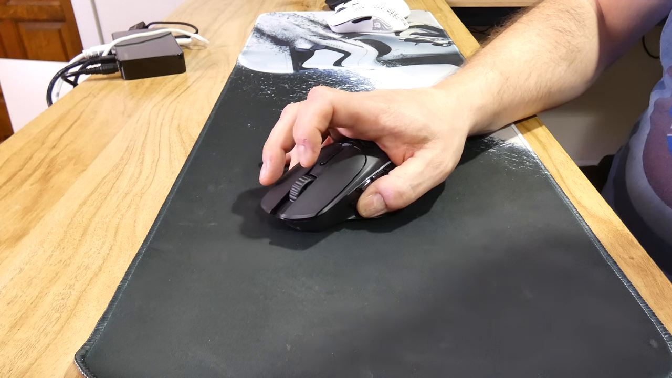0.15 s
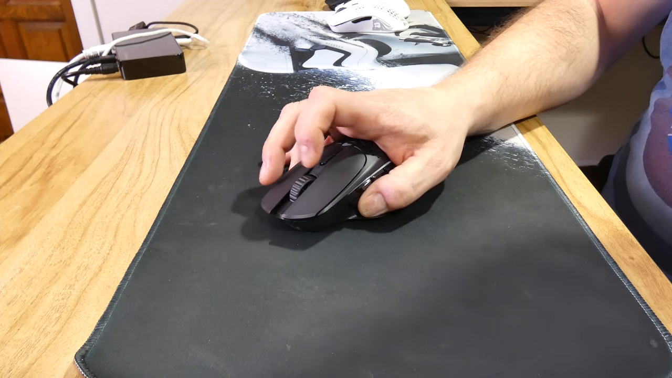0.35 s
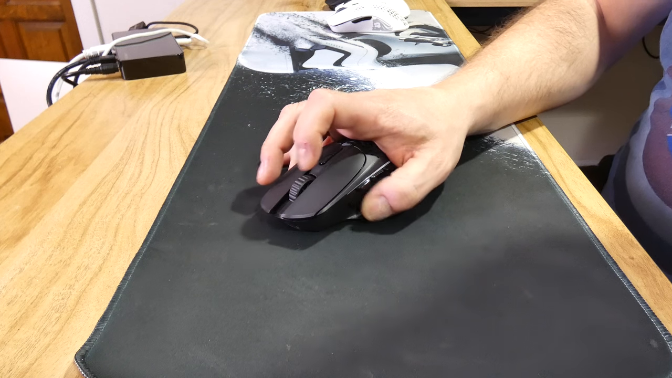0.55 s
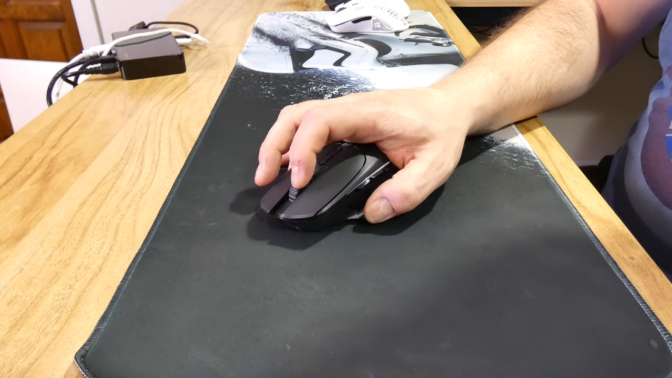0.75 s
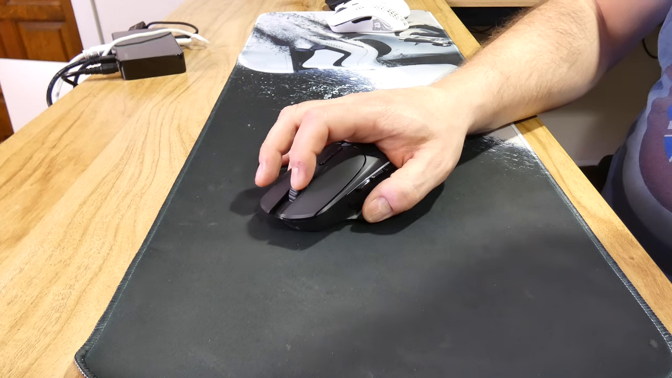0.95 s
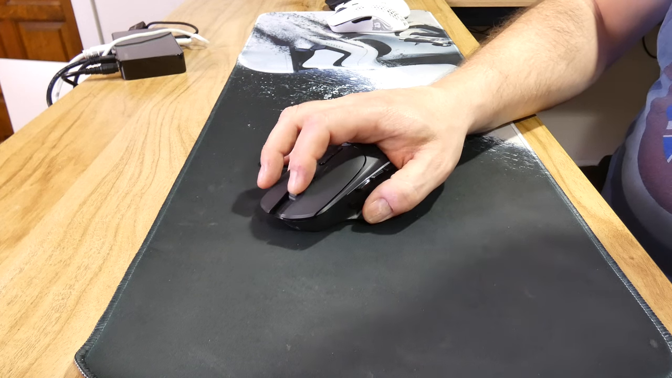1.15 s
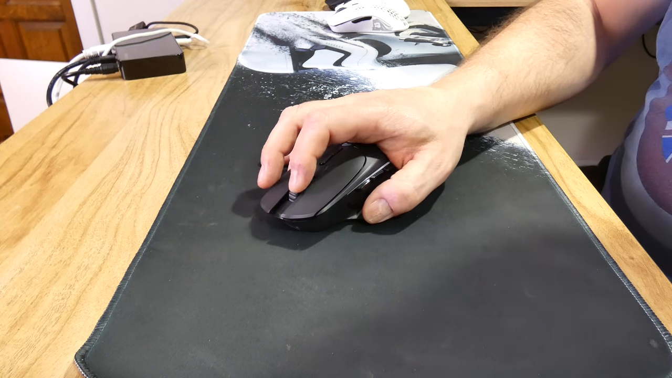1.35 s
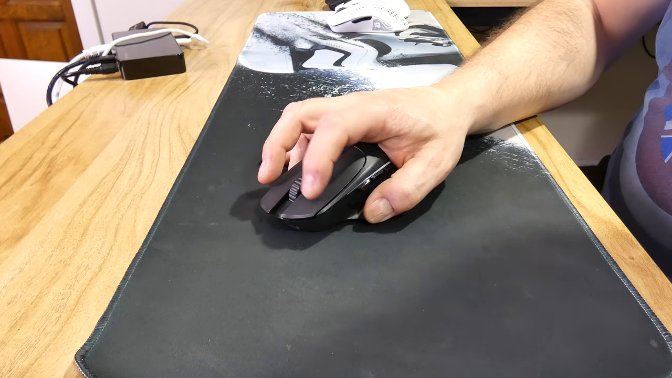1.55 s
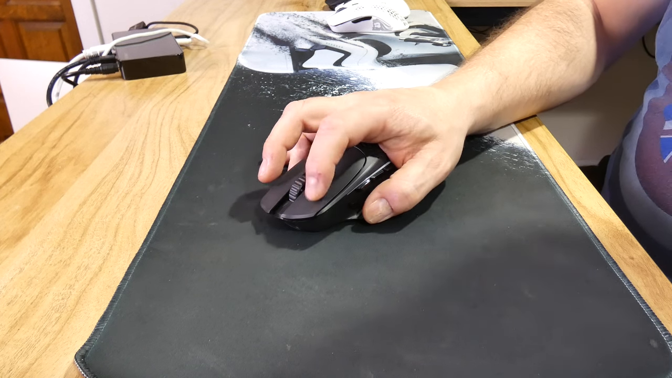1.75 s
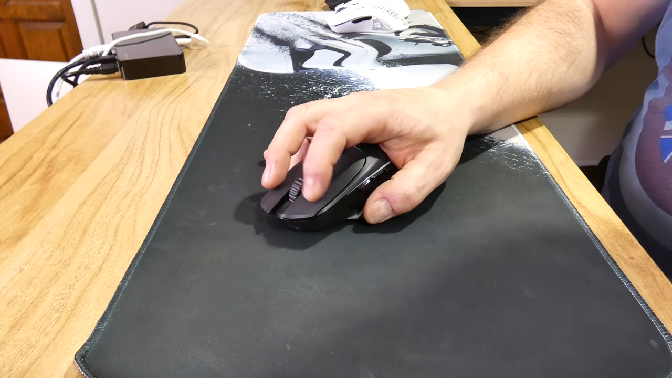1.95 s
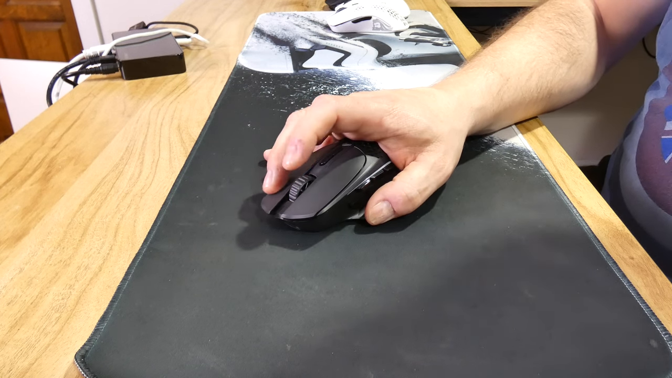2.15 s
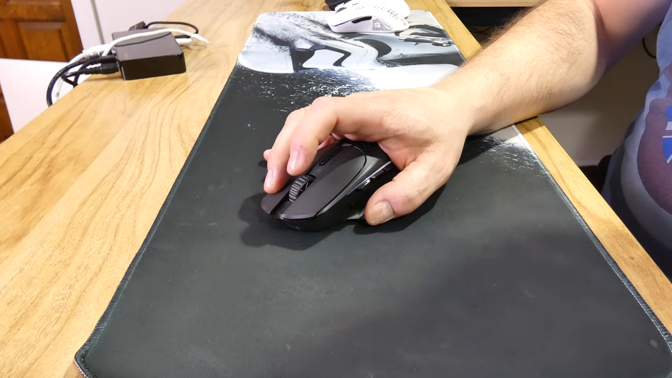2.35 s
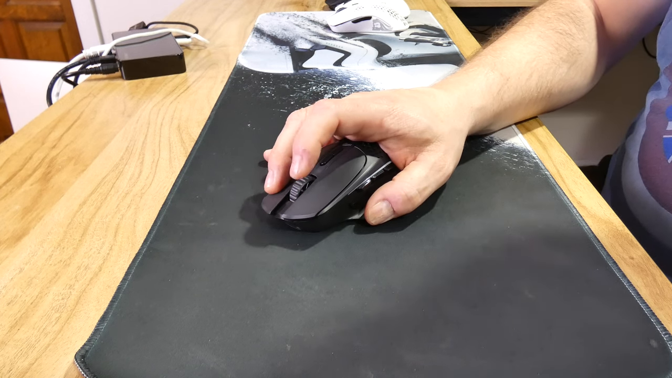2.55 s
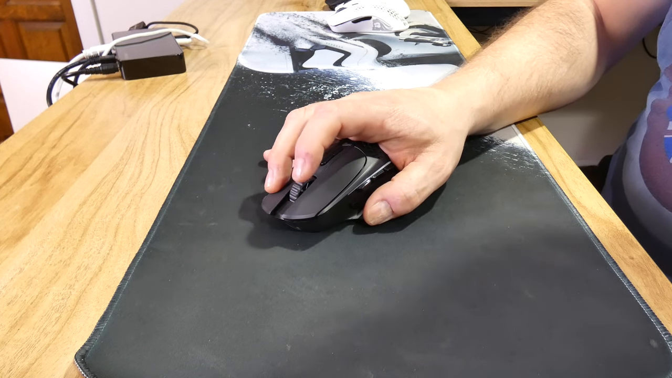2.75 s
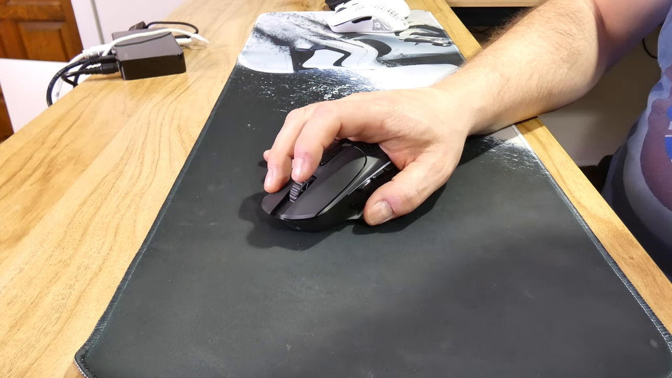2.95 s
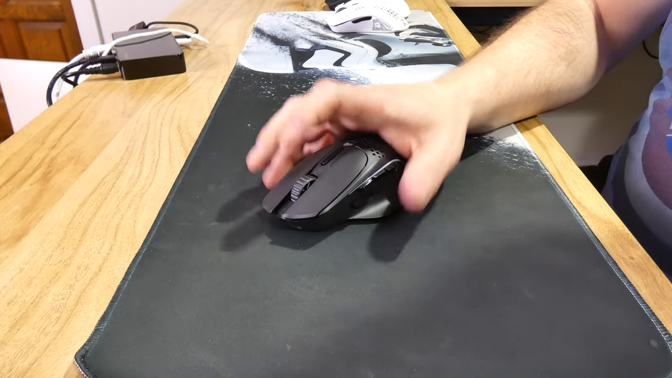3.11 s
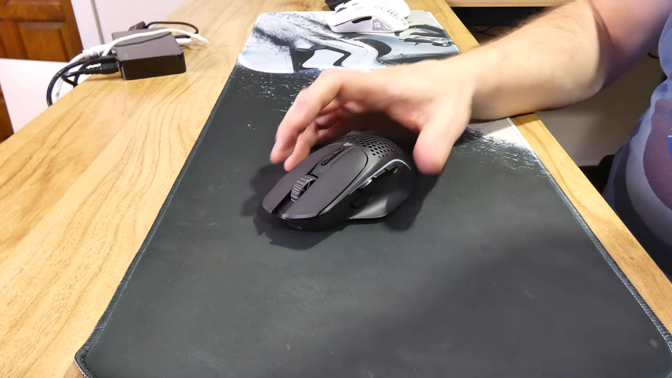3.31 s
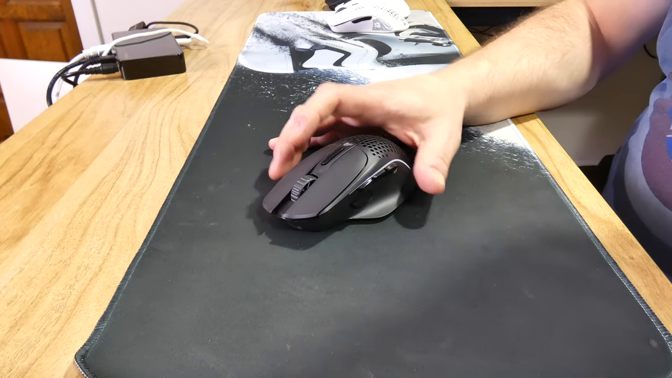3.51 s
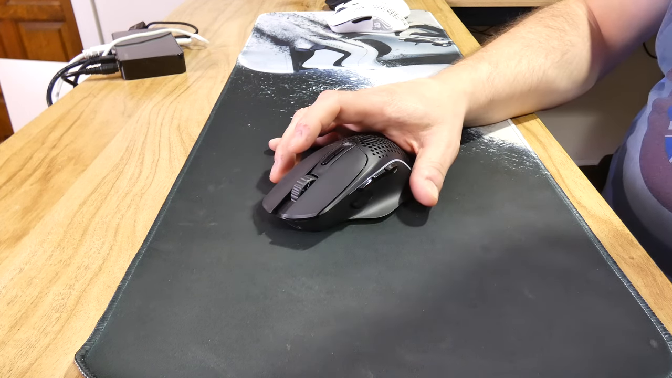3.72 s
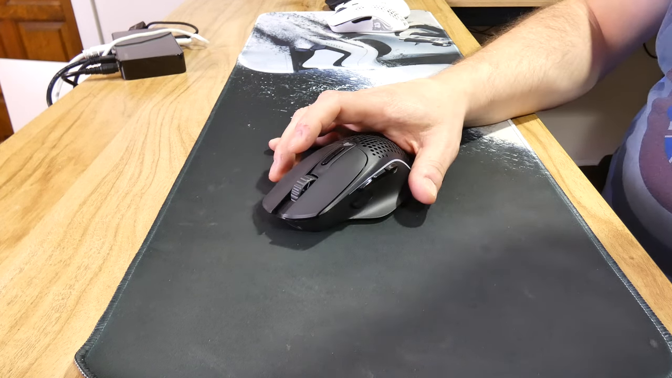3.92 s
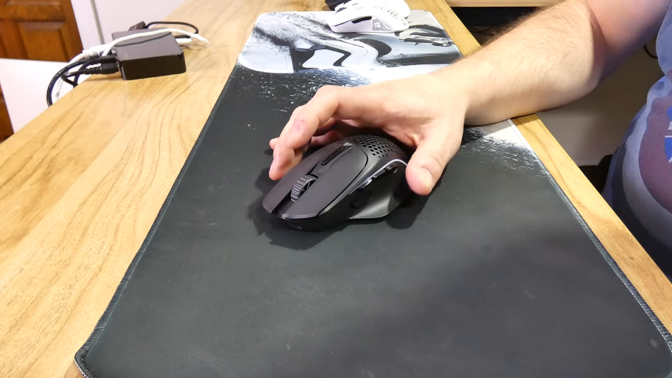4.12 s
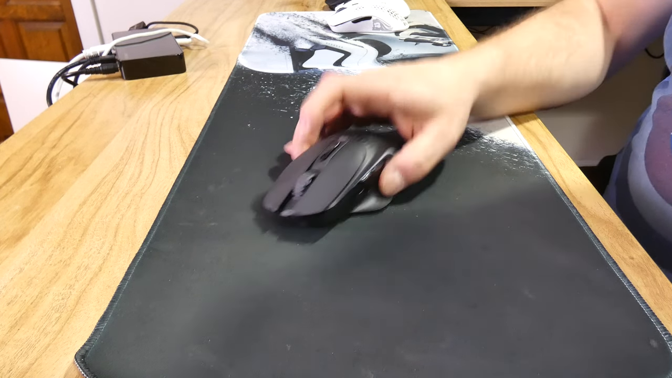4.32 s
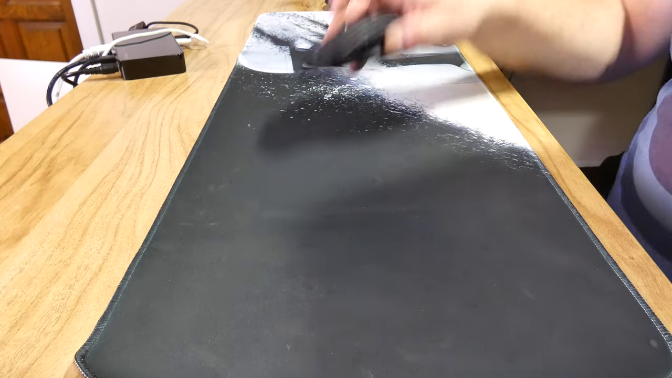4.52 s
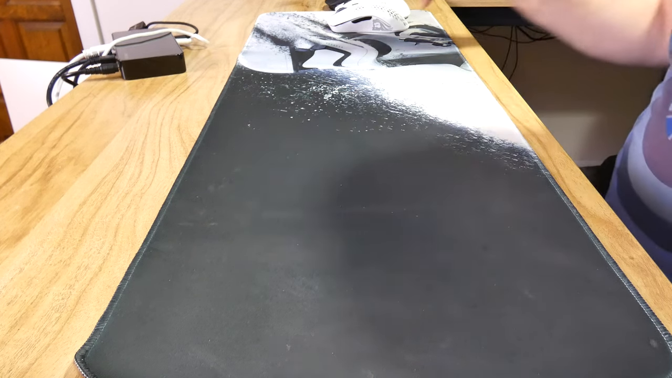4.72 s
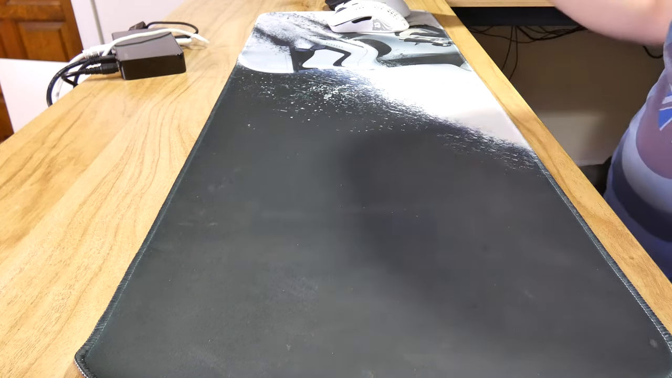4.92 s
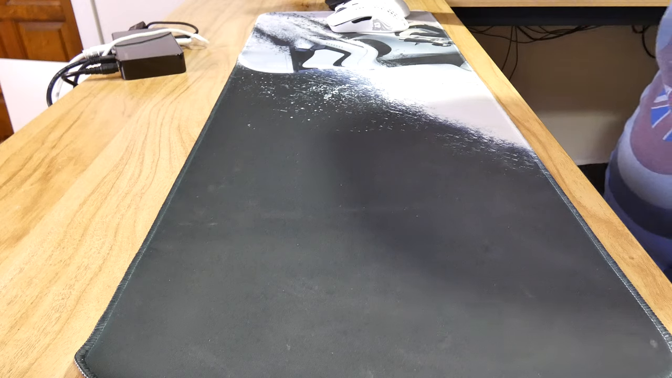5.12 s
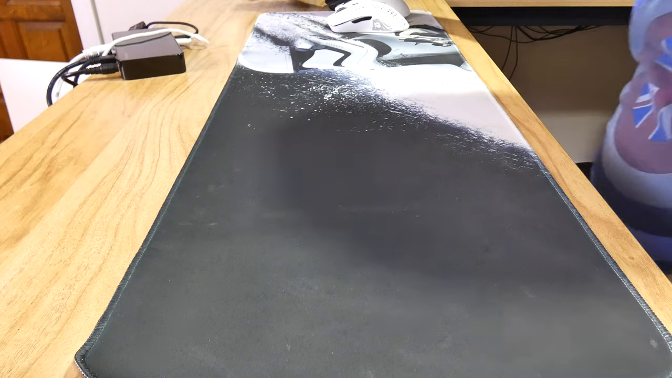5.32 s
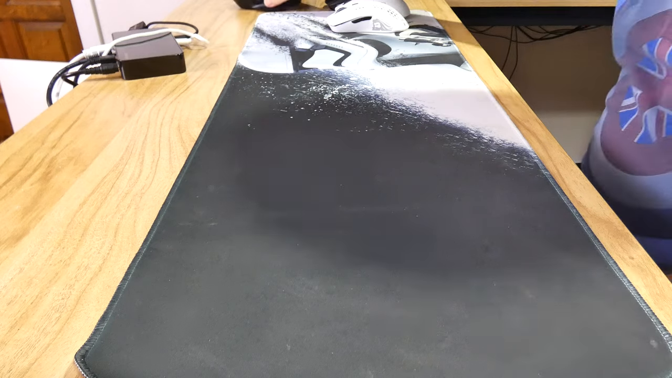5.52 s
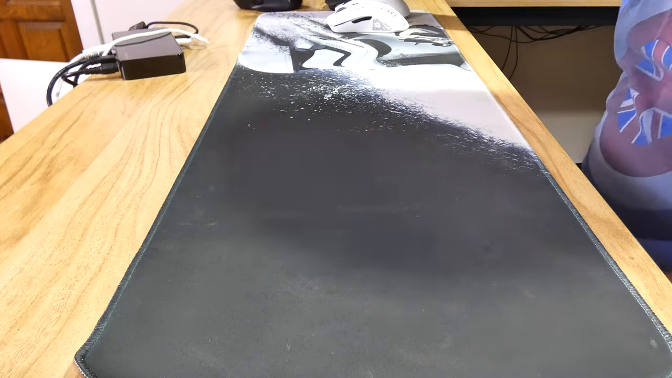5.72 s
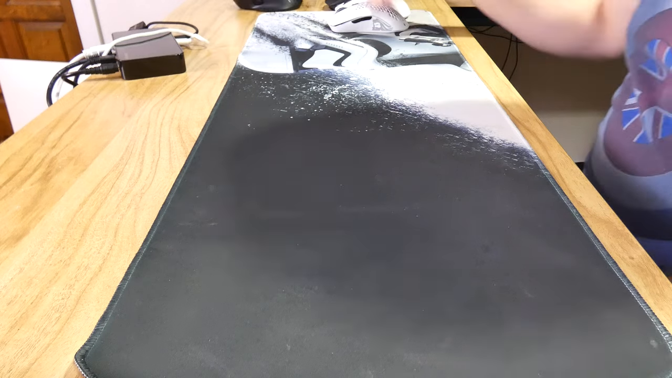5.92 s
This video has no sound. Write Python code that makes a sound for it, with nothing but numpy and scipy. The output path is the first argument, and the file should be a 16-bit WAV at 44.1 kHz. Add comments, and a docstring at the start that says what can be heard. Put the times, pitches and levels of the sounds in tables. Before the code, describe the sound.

Close, dry mouse clicks in four differently pitched groups over soft room hiss, ending with skin brushing and two loud knocks as the mouse is put down.

```python
"""Buttons of a computer mouse click on a cloth pad in a small quiet room, over steady noise and faint hum.
Thumb button, wheel, top button and main button snap in turn, each a chatter into its own ring, with soft
finger taps and skin brushing; then the hand brushes the shell more, a thin hiss slides as of cloth, and
the mouse is set down in knocks that ring the desk modes. Snaps, taps and knocks excite a decaying room."""
import sys
import numpy as np
from scipy import signal
from scipy.fft import rfft, irfft
from scipy.io import wavfile
from scipy.ndimage import uniform_filter1d

SR = 44100
rng = np.random.default_rng(int(sys.argv[2]) if len(sys.argv) > 2 else 0)


def master(y):
    """Save y as 16-bit WAV."""
    cut = np.clip(np.atleast_2d(y).T, -1, 1)
    pcm = np.round(cut * 32767)  # scale
    wavfile.write(sys.argv[1], SR, pcm.astype(np.int16))


N = 267245

# Steady room and microphone noise: (frequency [Hz], relative density [dB per Hz])
AIR_TONE = [(15, -77), (25, -35), (70, -25), (118, -3), (142, -3), (208, -7), (232, -17.5), (389, -2),
            (457, -15), (651, -7.5), (766, -15.5), (3910, -28.5), (12000, -33.5), (14400, -37),
            (15400, -65) ]
AIR_LEVEL_DB = -61.5
# Left-right likeness of that noise: (frequency [Hz], correlation [-1 to 1, clipped])
AIR_LIKENESS = [(60, 0.06), (150, -0.21), (380, -0.72), (950, -0.71), (2380, -0.32), (5980, 0.13),
                (15000, -1.2)]
# Faint fuzzy hum, swelling and fading: (time [s], level [dB])
HUM_LEVEL = [(0.3, -91), (0.84, -68.5), (1.7, -70.5), (1.86, -76), (2.92, -84), (3.55, -65), (3.94, -77.5),
             (4.34, -67.5), (4.88, -88), (5.1, -87), (5.49, -63)]
# Decay of the room tail: (frequency [Hz], t60 [s])
ROOM_T60 = [(200, 0.44), (500, 0.22), (1200, 0.18), (3000, 0.16), (8000, 0.14), (15000, 0.12)]
# Reflections from arm, screen and wall near the pad: (delay [ms], level [dB])
ECHOES = [(2.2, -10), (5.5, -4), (9.5, -12), (13.5, -12)]

# Brushing, bright part: (frequency [Hz], relative density [dB per Hz])
BRUSH_TONE = [(1180, -69), (2000, -11), (3010, -35), (3140, -9), (5120, -0.5), (7700, -6), (9830, -4.5),
              (14800, -17), (16000, -70)]
# Brushing, dull part: (frequency [Hz], relative density [dB per Hz])
BRUSH_DULL = [(150, -35), (300, 2), (700, 4), (1800, -1.5), (3000, -3.5), (5000, -16), (14800, -10),
              (15700, -50) ]
# Strokes of skin over plastic and cloth:
# (full from [s], full until [s], level [dB], dull part against bright [dB])
STROKES = [(0.413, 0.412, -63.5, 0.5), (0.637, 0.646, -66.5, 0.5), (3.157, 3.156, -64.5, 5),
           (3.222, 3.235, -64, -6.5), (3.311, 3.357, -72, 3), (3.41, 3.492, -62, -6),
           (4.234, 4.356, -65.5, -12), (4.378, 4.361, -55, -1), (4.446, 4.46, -63, 3.5),
           (4.567, 4.567, -68, -1), (4.696, 4.738, -70, -14)]
SWELL_DB_PER_S, FADE_DB_PER_S = 286, 370
# Thin steady hiss, as of a slide over cloth: (time [s], level [dB])
SLIDE_LEVEL = [(4.93, -80), (5.018, -67.5), (5.188, -70), (5.408, -66), (5.48, -78)]
# Its spectrum: (frequency [Hz], relative density [dB per Hz])
SLIDE_TONE = [(2060, -53), (3500, -15), (4330, -20), (5110, -8.5), (5660, -23), (6200, -2), (6430, -5.5),
              (8110, -11), (10300, -9), (11500, -11), (15000, -29)]

# Mouse and hand knocks on the desk: (time [s], peak of the desk ring [dB],
# brightness [dB per octave above 1 kHz], weight [dB per octave below 1 kHz],
# scuff above 4 kHz [dB], rattle decay [ms], room send [dB])
KNOCKS = [(4.762, -43, -12.5, 4.5, 2, 4.8, 2.5), (5.021, -40.5, -12.5, -11.5, -3, 10.4, 3.5),
          (5.096, -23.5, -4, -18, 12.5, 15.9, 8), (5.491, -5.5, -1.5, -2, 6, 3.8, 1.5),
          (5.614, -27.5, -2.5, -3.5, 7, 1.8, 4), (5.6446, -7, -0.5, 2, 1, 2.8, -2.5),
          (5.757, -41.5, 8, -9, 20, 1.6, -3.5), (6.022, -34, 4, -9, 9, 1.3, 0)]
# Desk top modes: (frequency [Hz], width [Hz], level [dB])
DESK = [(270, 60, -14), (360, 90, -5), (520, 120, 0), (620, 100, -6), (790, 170, -8), (1000, 220, -12),
        (1230, 260, -9), (1510, 280, -13), (1820, 330, -12), (2210, 350, -13), (2690, 500, -10),
        (3380, 820, -16), (5080, 1120, -25), (6410, 1260, -32), (8030, 1700, -33), (10010, 1650, -35),
        (12900, 1270, -46)]
# Hard feet and rim of the mouse: (frequency [Hz], width [Hz], level [dB])
EDGE_RING = [(1920, 600, -1), (2570, 600, -3.5), (3350, 810, -6)]
CRACK_DB = -4  # crack against the blow
CRACK_DULLS = 1.43  # crack dB lost per dB an octave of brightness, of either sign

# Switch rings, one table per switch and stroke: (frequency [Hz], width [Hz], level [dB])
THUMB_RING = [(1740, 190, -3), (2280, 400, -7), (2710, 380, 0), (3460, 350, -3), (3850, 580, -5),
              (4610, 770, -10), (5610, 600, -7), (6810, 760, -3), (9480, 1600, -9), (12520, 940, -18),
              (14040, 1890, -10)]
WHEEL_RING = [(2080, 350, -4), (3090, 840, -10), (3660, 490, -9), (4760, 680, 0), (5840, 740, -8),
              (6640, 650, -13), (8250, 1510, -11), (9960, 750, -15), (10980, 1910, -13), (14890, 1190, -10)]
TOP_DOWN_RING = [(2090, 500, -13), (2810, 430, -9), (3430, 860, -8), (4540, 660, -4), (5170, 600, -4),
                 (6830, 1290, 0), (8130, 690, 0), (9360, 710, -15), (10520, 3180, -11), (11320, 3580, -12)]
TOP_UP_RING = [(1640, 270, -19), (2050, 200, -19), (2600, 760, -18), (4020, 810, -4), (5950, 720, 0),
               (7210, 660, -9), (7910, 930, -9), (10400, 1170, 0), (13500, 2220, -15)]
MAIN_DOWN_RING = [(2050, 370, -9), (2450, 180, -15), (3010, 290, -6), (3420, 600, -10), (4560, 810, 0),
                  (6150, 790, -1), (8720, 1600, 1), (11150, 830, -9), (14410, 1430, -14)]
MAIN_UP_RING = [(1930, 380, -9), (2970, 310, -4), (3570, 480, -6), (4200, 650, -6), (5540, 730, -3),
                (6620, 820, -2), (8700, 1230, 0), (10610, 1200, -3), (13420, 1580, -11)]
# Mouse shell modes: (frequency [Hz], width [Hz], level [dB])
SHELL = [(740, 160, -15), (930, 140, -8), (1055, 90, 0), (1180, 120, -5)]
# Desk top under the pad: (frequency [Hz], width [Hz], level [dB])
THUD = [(218, 50, 0), (285, 60, -3), (385, 80, -6)]
# Seat of each switch in the shell, for a usual snap:
# switch and stroke: (ring table, shell ring [dB], thud [dB], left over right [dB])
SWITCHES = {"thumb": (THUMB_RING, -43, -60, -1.8), "wheel": (WHEEL_RING, -39, -41, -.1),
            "top down": (TOP_DOWN_RING, -35, -47, .1), "top up": (TOP_UP_RING, -41, -49, .2),
            "main down": (MAIN_DOWN_RING, -43, -47.5, .1), "main up": (MAIN_UP_RING, -41.5, -45.5, .1)}
# Switch snaps: (time [s], switch and stroke, snap peak [dB])
CLICKS = [(0.062, "thumb", -27.5), (0.1989, "thumb", -28), (0.3228, "thumb", -28), (0.431, "thumb", -28),
          (0.5602, "thumb", -27), (1.1369, "wheel", -26.5), (1.2507, "wheel", -28),
          (1.3528, "wheel", -26.5), (1.4783, "wheel", -26.5), (1.6871, "top down", -26),
          (1.8181, "top up", -22), (1.8766, "top down", -26.5), (2.0332, "top up", -21),
          (2.1947, "main down", -25), (2.3015, "main up", -23), (2.379, "main down", -25),
          (2.4908, "main up", -24), (2.5571, "main down", -25), (2.6713, "main up", -23),
          (2.7477, "main down", -22), (2.8847, "main up", -21.5), (2.9625, "main down", -25.5),
          (3.1055, "main up", -20)]
# Soft finger contacts and button travel, no snap: (time [s], shell ring [dB], thud [dB], tick [dB])
TAPS = [(0.354, -49.5, -51.5, -51), (0.409, -50, -70, -64), (0.608, -57, -57, -69), (1.502, -49, -73, -49),
        (1.66, -59, -55, -59), (1.714, -41.5, -46.5, -47), (1.811, -52.5, -46, -60), (2.009, -60, -60, -61),
        (2.162, -50, -67, -49), (2.406, -49, -82, -68), (2.767, -38, -59, -50), (2.958, -43.5, -49, -52),
        (2.981, -41, -69, -72), (3.098, -55, -64, -67), (4.306, -85, -48, -54), (4.45, -55, -44, -67),
        (5.96, -56, -54, -62), (6, -67.5, -47, -52.5)]
USUAL_SNAP_DB = -24
SHELL_GROWS, THUD_GROWS = 2.5, 0.96  # dB per dB that a snap is harder than usual
SNAP_MS, SNAP_CHATTER_DB = 2.32, 18
BODY_SEND_DB = -1  # low ring into the room, against the snap
BUTTON_ROOM_DB = -5
BAND_LIMIT_HZ = 16700


def gain_of(db):
    """Decibels to an amplitude factor."""
    return 10 ** (np.asarray(db) / 20)


def evened(x):
    """Scales to rms 1."""
    return x / np.sqrt(np.mean(x ** 2) + 1e-20)


def peaked(x):
    """Scales to peak 1."""
    return x / (abs(x).max() + 1e-20)


def read(points, hz):
    """Interpolates a table over log frequency."""
    f, value = np.transpose(points)
    return np.interp(np.log(hz + 1), np.log(f + 1), value)


def curve(rows):
    """Gain in time from (time [s], level [dB]) rows, silent outside them."""
    s, db = np.transpose(rows)
    return gain_of(np.interp(np.arange(N) / SR, s, db, left=-200, right=-200))


def add(mix, s, sound):
    """Mixes a sound in at s seconds, cut at the end."""
    part = mix[..., round(s * SR):][..., :sound.shape[-1]]
    part += sound[..., :part.shape[-1]]


def noise(tone, same=None, patchy_db=0., likeness=0.91):
    """Stereo noise of rms 1: random short-time spectra with drifting patches."""
    frames, hz = N // 128 + 5, np.fft.rfftfreq(512, 1 / SR)
    a, b, c, d, patches = rng.standard_normal((frames, 257, 5)).T
    patches = uniform_filter1d(patches, size=8, axis=0)
    patches = evened(uniform_filter1d(patches, size=10, axis=1))
    like = np.clip(read(same, hz)[:, None] if same else likeness, -1, 1)
    left = a + 1j * b
    right = like * left + np.sqrt(1 - like ** 2) * (c + 1j * d)
    z = np.array([left, right]) * gain_of(read(tone, hz)[:, None] + patchy_db * patches)
    return evened(signal.istft(z, nperseg=512, noverlap=384)[1][:, :N])


def ring(modes):
    """Spectrum of a causal ring: steep-sided resonances, shared out a little differently at every blow."""
    hz, width_hz, db = np.transpose(modes)[:, :, None]
    db = db + 2.0 * rng.standard_normal(db.shape)
    width_hz = np.maximum(width_hz, .075 * hz)  # plastic and wood lose a share of energy per cycle
    off = 2 * (np.fft.rfftfreq(8192, 1 / SR) - hz) / width_hz
    power = (gain_of(2 * db) / (1 + off ** 2) ** 1.5).sum(0)
    cepstrum = irfft(np.log(power + 1e-9) / 2)
    cepstrum[1:4096] *= 2  # folded cepstrum: least-delay phase
    return np.exp(rfft(cepstrum[:4097], 8192))


def blow(decay_ms, chatter_db):
    """Spectrum of a contact: half a millisecond of build-up, one firm push, then decaying chatter."""
    push_at = 24
    t_ms = (np.arange(8192) - push_at) / SR * 1000
    fade = np.exp(np.where(t_ms < 0, t_ms / .2, -t_ms / decay_ms))
    push = gain_of(chatter_db) * rng.standard_normal(8192) * fade
    push[push_at] = 1
    z = rfft(push)
    flat = irfft(z / abs(z))  # even spectrum, so the modes set the tone
    return rfft(flat * np.sqrt(fade))


def struck(modes, db, decay_ms, chatter_db=-12.):
    """A blow into a set of modes, with its peak at db."""
    return gain_of(db) * peaked(irfft(blow(decay_ms, chatter_db) * ring(modes))[:6000])


def body(shell_db, thud_db):
    """The shell rings near 1 kHz and the desk top answers low."""
    shell = struck(SHELL, shell_db, decay_ms=.8, chatter_db=-25.)
    return shell + struck(THUD, thud_db, decay_ms=1.5, chatter_db=-25.)


def room(x, likeness, echoes=()):
    """Any early echoes, and a dense stereo tail whose bands die at their own speeds."""
    taps = rng.standard_normal((2, SR // 2))
    taps[1] = likeness * taps[0] + np.sqrt(1 - likeness ** 2) * taps[1]
    hz, t, z = signal.stft(taps, SR, nperseg=256)
    decay_db = -60 * t / read(ROOM_T60, hz)[:, None]
    tail = signal.istft(z * gain_of(decay_db), SR, nperseg=256)[1]
    tail *= 1 - np.exp(-(np.arange(tail.shape[1]) / (.004 * SR)) ** 2)  # build-up over 4 ms
    tail /= np.linalg.norm(tail[0])
    for ms, db in echoes:
        tail[:, round(ms * SR / 1000)] += gain_of(db)
    return signal.fftconvolve(x[None], tail, axes=1)[:, :N]


def air():
    """Steady room and microphone noise, plus hum: noise through a narrow resonance at 365 Hz."""
    t = np.arange(1500) / SR
    resonance = np.exp(-np.pi * 60 * t) * t * np.sin(2 * np.pi * 365 * t)
    hum = signal.fftconvolve(rng.standard_normal(N), resonance)[:N]
    steady = gain_of(AIR_LEVEL_DB) * noise(AIR_TONE, same=AIR_LIKENESS, patchy_db=-1.5)
    return steady + curve(HUM_LEVEL) * evened(hum)


def stroke(start_s, end_s, db):
    """Gain of one stroke: swells, holds and fades, straight in dB."""
    range_db = 50
    end_s = max(start_s, end_s)
    return curve([(start_s - range_db / SWELL_DB_PER_S, db - range_db), (start_s, db), (end_s, db),
                  (end_s + range_db / FADE_DB_PER_S, db - range_db)])


def rubbing():
    """Skin on plastic and cloth: grainy hiss, duller where it presses; and the steady hiss of a slide."""
    grain_db = 1.3 * evened(uniform_filter1d(rng.standard_normal(N), size=150))
    bright, dull = noise(BRUSH_TONE, patchy_db=-2.0), noise(BRUSH_DULL, patchy_db=3.0)
    brush = np.zeros((2, N))
    for start_s, end_s, db, dull_db in STROKES:
        brush += stroke(start_s, end_s, db) * (bright + gain_of(dull_db) * dull)
    slide = curve(SLIDE_LEVEL) * noise(SLIDE_TONE, patchy_db=2.5)
    return gain_of(grain_db) * brush + slide


def knocks():
    """Blows ring one desk: hard edges favour high modes, heavy flat landings low ones; a short crack is added."""
    dry, wet = np.zeros(N), np.zeros(N)
    hz, width_hz, mode_db = np.transpose(DESK)
    octaves = np.log2(hz / 1000)
    for s, db, bright_db, weight_db, scuff_db, rattle_ms, room_db in KNOCKS:
        tilt_db = bright_db * np.maximum(octaves, 0) - weight_db * np.minimum(octaves, 0)
        tilt_db += scuff_db * (octaves > 2)
        desk = struck(np.transpose([hz, width_hz, mode_db + tilt_db]), db, rattle_ms)
        crack_db = db + CRACK_DB - CRACK_DULLS * abs(bright_db)
        crack = struck(EDGE_RING, crack_db, decay_ms=1.7, chatter_db=0.1)
        add(dry, s, desk + crack)
        add(wet, s, gain_of(room_db) * desk)
    return dry + room(wet, likeness=0.74)


def buttons():
    """A spring leaf snaps over: chatter of a few milliseconds rings switch, shell and desk; taps only tick."""
    dry = np.zeros((2, N))
    wet = np.zeros((3, N))  # the hand shifts: blows take turns among three paths into the room
    for k, (s, switch, snap_db) in enumerate(CLICKS):
        modes, shell_db, thud_db, pan_db = SWITCHES[switch]
        harder_db = snap_db - USUAL_SNAP_DB
        snap = struck(modes, snap_db, SNAP_MS, SNAP_CHATTER_DB)
        low = body(shell_db + SHELL_GROWS * harder_db, thud_db + THUD_GROWS * harder_db)
        add(dry, s, (snap + low) * gain_of([[pan_db / 2], [-pan_db / 2]]))
        add(wet[k % 3], s, snap + gain_of(BODY_SEND_DB) * low)
    for k, (s, shell_db, thud_db, tick_db) in enumerate(TAPS):
        tick = struck(MAIN_DOWN_RING, tick_db, decay_ms=13.0, chatter_db=-22.0)
        low = body(shell_db, thud_db)
        add(dry, s, (tick + low)[None])
        add(wet[k % 3], s, tick + gain_of(BODY_SEND_DB) * low)
    reverb = sum(room(path, likeness=0.57, echoes=ECHOES) for path in wet)
    return dry + gain_of(BUTTON_ROOM_DB) * reverb


def scene():
    """Sums all sources; small objects radiate no deep bass, so blows are high-passed at 140 Hz."""
    no_bass = signal.butter(4, 140, "high", fs=SR, output="sos")
    return air() + rubbing() + signal.sosfilt(no_bass, knocks() + buttons())


def record(dry):
    """Low-passes at the band limit with a linear-phase filter."""
    lowpass = signal.firwin(511, BAND_LIMIT_HZ, window=("kaiser", 9), fs=SR)
    return signal.oaconvolve(dry, lowpass[None], "same")


dry = scene()
out = record(dry)
master(out)
```